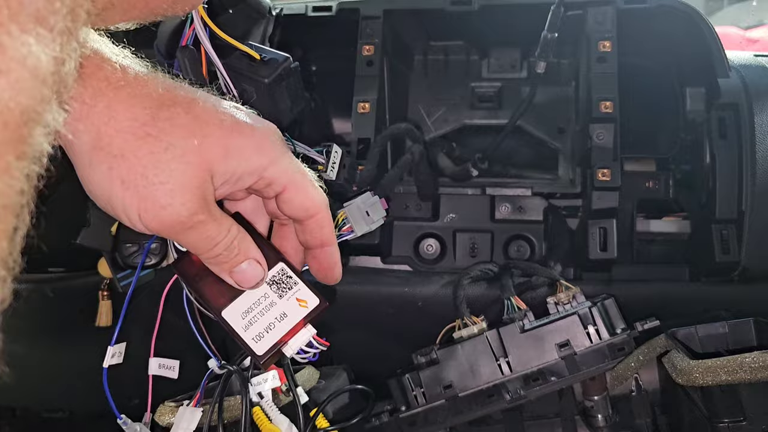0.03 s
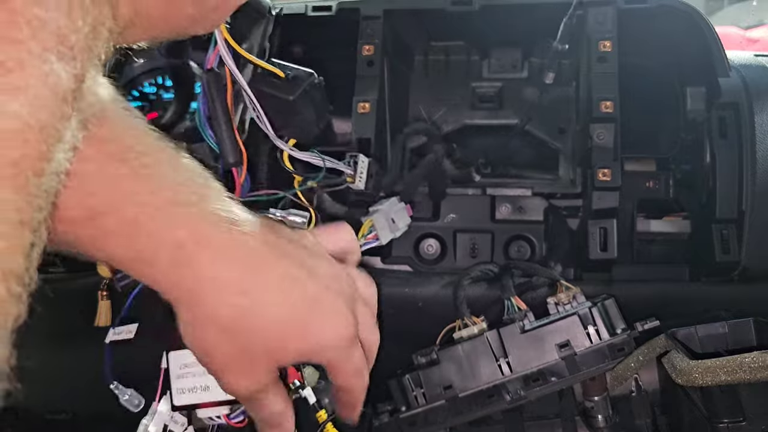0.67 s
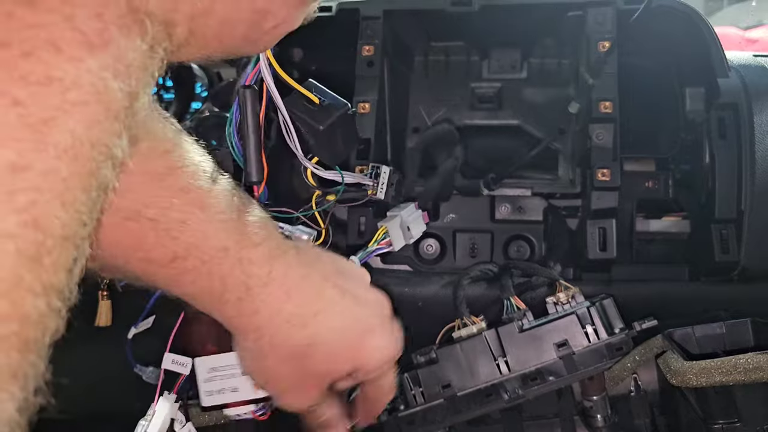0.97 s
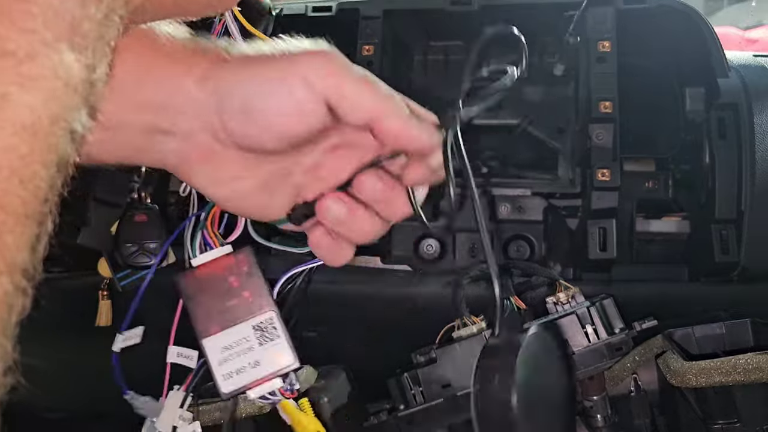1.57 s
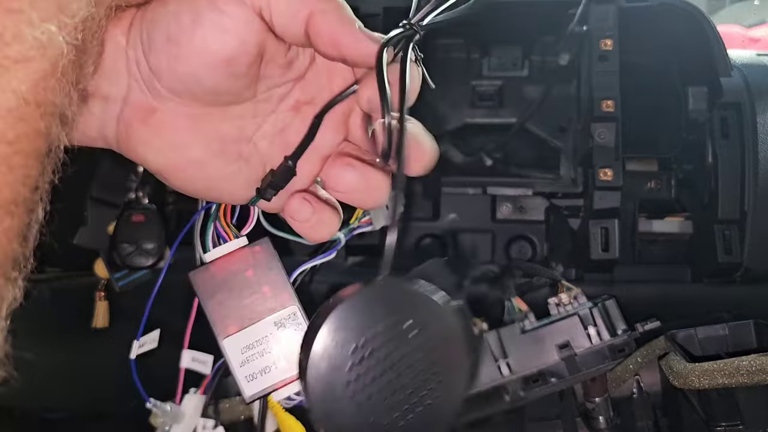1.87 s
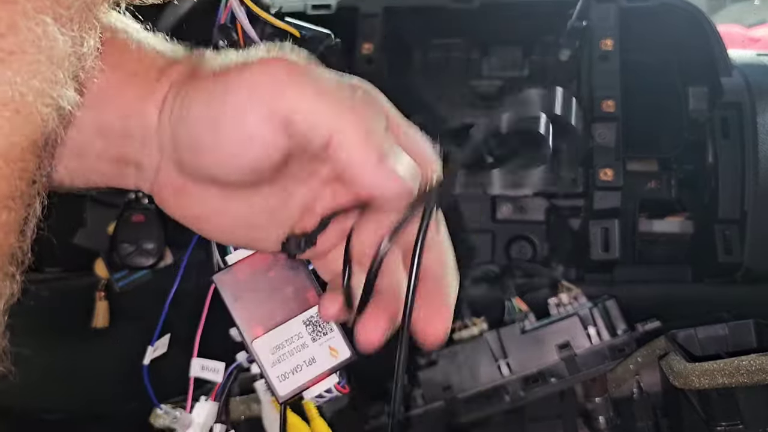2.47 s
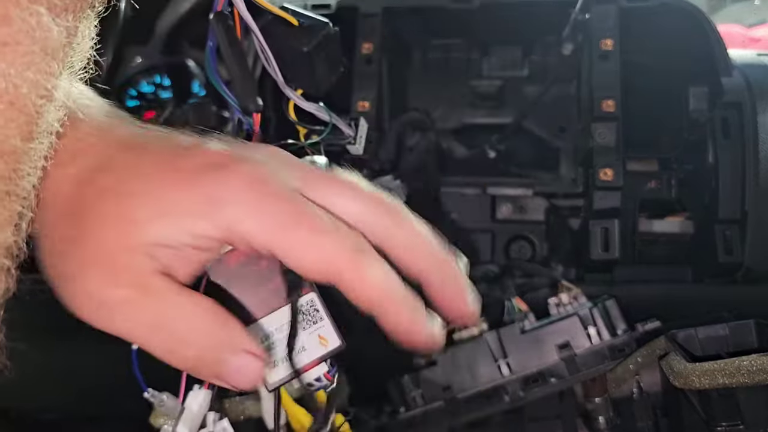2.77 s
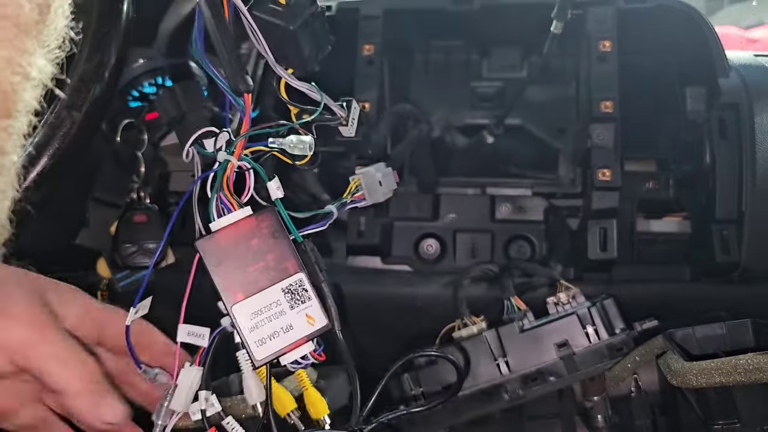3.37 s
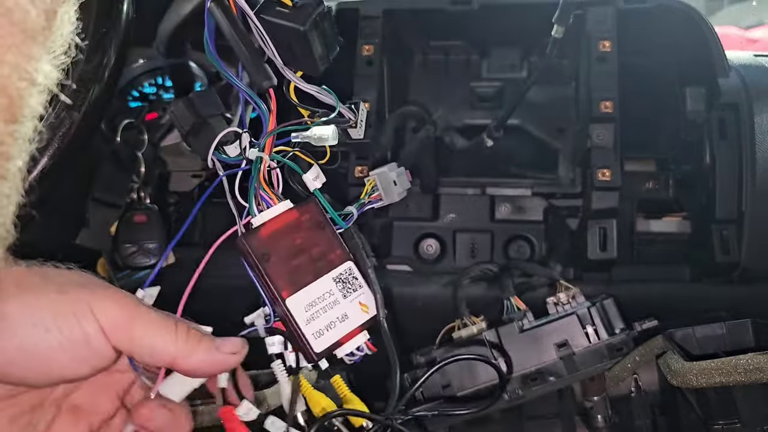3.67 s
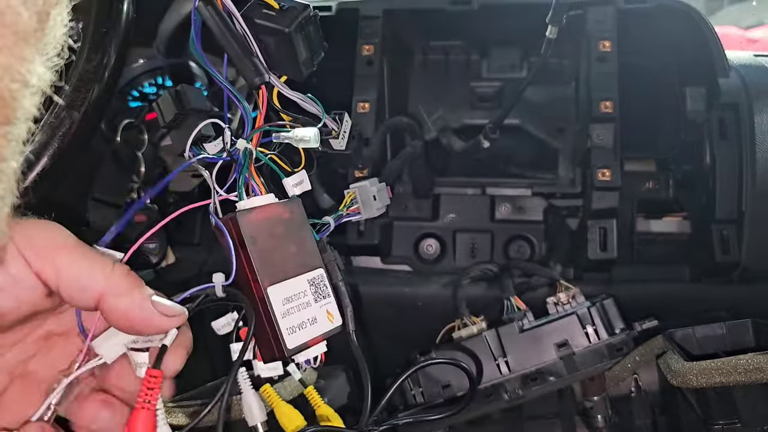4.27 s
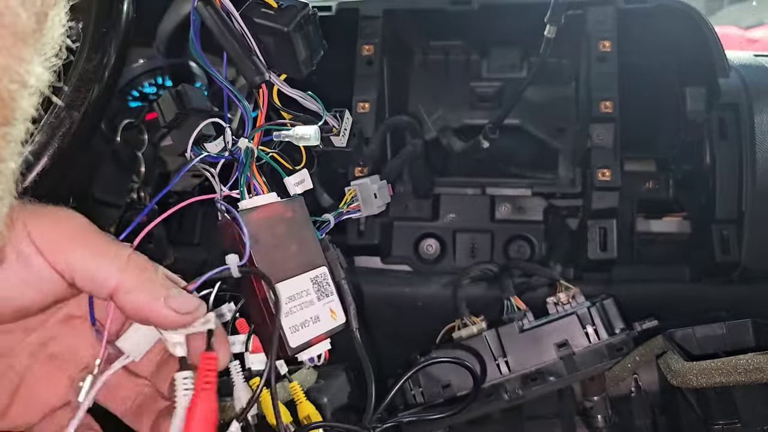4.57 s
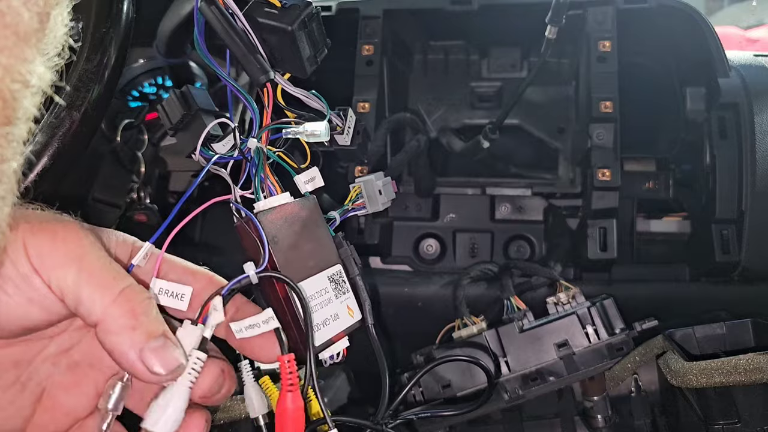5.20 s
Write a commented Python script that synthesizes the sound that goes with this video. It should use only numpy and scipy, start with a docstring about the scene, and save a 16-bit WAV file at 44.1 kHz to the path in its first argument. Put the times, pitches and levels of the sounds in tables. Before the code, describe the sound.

Hands sort a wiring harness in a car, with close plastic clicks, rustling cables and one hard knock against the dashboard.

```python
"""Plastic plugs clack and tick up close as hands sort a wiring harness in an opened car dashboard.
Each plug rings its hollow shell and shakes the trim; cables stick and slip, and fingers swish along them.
Midway a small speaker on its lead is set down with a bump and a hard knock that ring the dashboard panel.
A few very faint, high whistles come and go. A low rumble and a faint hiss fill the dead, padded cabin."""
import sys
import numpy as np
from scipy import signal
from scipy.fft import rfft, irfft, next_fast_len
from scipy.io import wavfile
from scipy.ndimage import uniform_filter1d, map_coordinates

SR = 44100
rng = np.random.default_rng(int(sys.argv[2]) if len(sys.argv) > 2 else 0)


def output_pcm(signal):
    """Save a mono or channel-first signal as 16-bit PCM at the path in sys.argv[1].

    Samples are clipped to [-1, 1] before scaling.
    """
    pcm = np.clip(np.atleast_2d(signal).T, -1, 1) * 32767
    wavfile.write(sys.argv[1], SR, np.round(pcm).astype(np.int16))


N = 235361
TIME = np.arange(N) / SR
RING = np.arange(SR // 5) / SR  # time axis of one hit or stroke, in seconds

# Levels in all tables are relative; each layer sets its own gain in the mix.
# bright snap of hard edges: pitch_hz, width_hz, level_db
EDGE_MODES = [(6020, 1500, -6), (7440, 830, 2), (7960, 1000, 1.5), (9260, 400, 1.5), (11180, 1000, -6.5),
              (14600, 2500, -12.5)]
# how hard the cables rub as the hands work: time_s, drag_db, swish_db
RUB_LEVELS = [(0.0, -55, -87), (0.27, -62.5, -79), (0.39, -51.5, -68), (0.77, -47, -60), (1.11, -53, -69.5),
              (1.31, -54.5, -60.5), (1.8, -51, -63.5), (2.36, -54, -73.5), (2.6, -58, -70),
              (2.75, -50, -64.5), (2.88, -43, -58.5), (3.03, -56, -64), (3.17, -46.5, -67.5),
              (3.36, -60, -71), (3.73, -55.5, -68.5), (3.88, -59.5, -67.5), (4.03, -59, -69.5),
              (5.34, -56.5, -71.5)]


def clack(trim_db, edge_db, shell_hz, trim_hz):
    """A plug rings its hollow shell and shakes the trim; a harder edge adds crack and snap."""
    # hollow plug shell: pitch_ratio, width_hz, level_db
    shell_modes = [(.58, 122, -10.5), (.82, 98.5, -7), (1, 65, 6), (1.28, 130, -11.5), (1.5, 170, -4.5)]
    # trim behind the plug: pitch_ratio, width_hz, level_db
    trim_modes = [(.7, 91, -3.5), (1, 69, 4), (1.5, 150, -4.5), (2.1, 221, -9)]
    # stiff plastic walls: pitch_hz, width_hz, level_db
    crack_modes = [(1832, 110, 3), (2650, 400, 0), (3360, 500, 3), (4270, 4000, 0.5), (5420, 1000, -7.5)]
    top_hz = 3540  # shell and trim radiate little above this
    shell = dull(strike(shell_modes, t60=0.0283, direct=0.75, tune=shell_hz), top_hz)
    trim = dull(strike(trim_modes, t60=0.0508, direct=0.83, tune=trim_hz), top_hz)
    crack = amp(0.68 * edge_db - 0.5) * strike(crack_modes, t60=0.0443, direct=0.19)
    snap = amp(edge_db) * strike(EDGE_MODES, t60=0.0189, direct=0.1) * pan(2.4)
    left_db = 2.5 + 1.6 * rng.standard_normal()  # the harness hangs to the left
    return amp(trim_db - 3.5) * trim + (shell + crack + snap) * pan(left_db)


def plug_clacks():
    """Plugs strike the dashboard; some bounce and land again, softer."""
    # plug hits: start_s, level_db, trim_db, edge_db, shell_hz, trim_hz, bounce_count
    hits = [(0.032, -46.5, 11.5, -39, 1080, 362, 0), (0.252, -37.5, -10, -25, 1113, 465, 0),
            (0.404, -33, -7, -19.5, 834, 437, 0), (0.69, -30.5, 9, -23, 1230, 343, 1),
            (1.1, -32, 10.5, -7.5, 1070, 326, 0), (1.166, -34.5, 10, -13, 810, 240, 0),
            (1.172, -25, 0.5, -22, 970, 610, 0), (1.204, -29.5, -11, -32, 1110, 332, 0),
            (1.382, -23.5, -5.5, 2.5, 1290, 450, 1), (1.568, -44, -2, -6, 900, 600, 0),
            (1.59, -26.5, -14, -14.5, 1111, 560, 0), (1.802, -43, -8, -34, 1070, 258, 0),
            (2.405, -37.5, 9, -35, 810, 270, 0), (3.077, -25, -3, -43, 903, 242, 0),
            (3.108, -15.5, -26, -23, 913, 334, 1), (3.155, -25, -6, -22.5, 838, 245, 0),
            (3.641, -34.5, 10.5, -25, 995, 364, 0), (3.675, -33, 7.5, -20, 910, 278, 0),
            (3.69, -32.5, 8, -17, 1090, 263, 0), (3.814, -47, 9, -18.5, 1510, 265, 0),
            (4.067, -43, 2.5, -10.5, 1050, 525, 0), (4.29, -50.5, 8, -36, 1460, 295, 0),
            (4.587, -45, 9.5, -11.5, 1030, 316, 0), (4.868, -39, 8, -36, 1020, 557, 0)]
    flight_s, bounce_db = 0.023, -12.5
    out = np.zeros((2, N))
    for start, db, trim_db, edge_db, shell_hz, trim_hz, bounces in hits:
        for k in range(1 + round(bounces)):
            landing = clack(trim_db, edge_db, shell_hz, trim_hz)
            add(out, start + k * flight_s, amp(db - 3 + k * bounce_db) * landing)
    return out


def plug_touches():
    """Loose plugs brush the trim by chance, louder while the cables are dragged harder."""
    touches_per_s, scatter_db, detune = 3, 1.2, 0.12
    out = np.zeros((2, N))
    drag_db, _ = curves(RUB_LEVELS)
    count = round(touches_per_s * N / SR)
    starts = rng.uniform(0, TIME[-1], count)
    for start, (size, shell, trim) in zip(starts, rng.standard_normal((count, 3))):
        db = drag_db[int(start * SR)] - 0.5 + scatter_db * size
        touch = clack(trim_db=5, edge_db=-24,
                      shell_hz=1383 * np.exp(detune * shell), trim_hz=312 * np.exp(detune * trim))
        add(out, start, amp(db) * touch)
    return out


def pin_ticks():
    """Pins and wire ends are too light to move the trim: treble only."""
    # light taps: start_s, level_db, snap_db, glint_db
    taps = [(0.473, -45.5, -15, -24), (0.6844, -44.5, 4.5, -10), (1.074, -41, 0, -9),
            (1.0862, -40, -6, -10), (1.1434, -32.5, -10, -25), (1.661, -39, -13, -18),
            (1.938, -39.5, -28, -24), (2.0634, -42, -24, -16), (2.6467, -32, -7, 3),
            (3.1009, -33.5, 14, -8), (3.184, -38, -13, -26), (3.244, -42.5, -27, -30),
            (3.7895, -42.5, -22, -29), (3.9687, -45, -8, -22), (4.3516, -51.5, 2.5, 4.5),
            (4.4543, -54, 4, 9), (4.4927, -53, -2, 3), (4.7728, -51, 3, -10)]
    # wire ends: pitch_hz, width_hz, level_db
    wire_modes = [(2824, 3300, 7.5), (4780, 350, 9.5), (6240, 810, -2.5)]
    # glint of metal pins: pitch_hz, width_hz, level_db
    pin_modes = [(11700, 400, -6), (13200, 1000, -8.5), (14300, 900, -9.5)]
    out = np.zeros((2, N))
    for start, db, snap_db, glint_db in taps:
        wire = strike(wire_modes, t60=0.034, direct=0.8)
        snap = amp(snap_db) * strike(EDGE_MODES, t60=0.039, direct=0.35)
        glint = amp(glint_db) * strike(pin_modes, t60=0.022, direct=0.4)
        add(out, start, amp(db - 9) * (wire + snap + glint) * pan(4))
    return out


def speaker_knocks():
    """The speaker lands on the dashboard; a softer contact leaves only the lowest panel modes."""
    # heavy blows: start_s, level_db, cutoff_hz, crack_db
    blows = [(2.694, -10, 215, -26), (2.722, -25.5, 59.5, -56), (2.808, -25, 200, -45),
             (2.904, 0, 1198, -22), (2.9114, -6.5, 1050, -16), (2.952, -17.5, 940, -23.5),
             (3.101, -18.5, 183, -36)]
    # dashboard panel: pitch_hz, width_hz, level_db
    panel_modes = [(54.86, 9.4, -6.5), (126.4, 40, -8.5), (164, 43, -3), (241.4, 55, -2.5), (345, 60, -5.5),
                   (494, 180, -6), (696, 120, -2), (828, 73, -5), (908, 89, -5.5), (1334, 75, -5),
                   (1471, 110, -9.5), (1900, 160, -18.5), (2130, 60, -16)]
    # the speaker's hard case: pitch_hz, width_hz, level_db
    case_modes = [(3170, 960, -2), (4300, 400, -2.5), (5200, 1300, -6.5)]
    out = np.zeros((2, N))
    for start, db, cutoff_hz, crack_db in blows:
        force = dull(contact(t60=0.034, direct=2.2, wide_db=-2), cutoff_hz)
        panel = crest(resonate(force, panel_modes))
        case = strike(case_modes, t60=0.081, direct=0.1)
        snap = amp(-6.5) * strike(EDGE_MODES, t60=0.054, direct=0.11)
        crack = amp(crack_db - 3.5) * (case + snap)
        add(out, start, amp(db - 5.5) * (panel + crack) * pan(2))
    return out


def cable_rub():
    """Insulation sticks and slips on the trim; skin swishes along the wires."""
    # tone of the drag: frequency_hz, level_db
    drag_tone = [(110, -40.5), (180, -5.5), (351, -2), (451, -13), (820, -16.5), (891, -13.5), (1080, -19),
                 (1350, -16.5), (1600, -26.5), (3390, -34), (4730, -32.5), (5000, -35.5), (6500, -65),
                 (11000, -120)]
    drag_db, swish_db = curves(RUB_LEVELS)
    slips = stereo_noise(N) * amp(2.4 * wobble(120))
    return amp(drag_db - 1.5) * colour(slips, drag_tone) + amp(swish_db + 1.5) * skin_swish()


def cable_pulls():
    """A firmly pulled cable chatters against the trim and the panel while fingers slide along it."""
    # pulls: start_s, end_s, chatter_db, cutoff_hz, swish_db
    strokes = [(0.208, 0.331, -64, 1500, -61), (0.687, 0.745, -40, 1700, -52.5),
               (0.778, 0.836, -38, 1010, -72), (0.891, 0.964, -74, 1000, -51.5),
               (1.1, 1.22, -45, 1600, -59), (1.789, 1.952, -51, 4000, -74), (1.982, 2.097, -56, 2500, -62),
               (2.92, 3.098, -39.5, 1330, -74), (3.529, 3.655, -48.5, 3200, -63),
               (3.645, 3.735, -38.5, 2200, -55)]
    # trim chattering under the cable: pitch_hz, width_hz, level_db
    trim_modes = [(158, 39, -2), (244, 160, -4), (319.5, 108, -2.5), (558, 49, -10.5)]
    # panel rasping under the cable: pitch_hz, width_hz, level_db
    panel_modes = [(728, 64, 6), (1068, 100, 1.5), (1302, 36, 3), (2020, 550, -7)]
    grip_s = 0.023  # time to take hold and to let go
    out = np.zeros((2, N))
    slips = stereo_noise(N) * amp(3.5 * wobble(200))
    chatter = unit(resonate(slips, trim_modes)) + amp(-1.5) * unit(resonate(slips, panel_modes))
    swish = skin_swish()
    for start, end, chatter_db, cutoff_hz, swish_db in strokes:
        span = slice(round(start * SR), round(start * SR) + len(RING))
        grip = np.clip(np.minimum(RING, end - start - RING) / grip_s, 0, 1)
        cable = amp(chatter_db) * dull(grip * chatter[:, span], cutoff_hz)
        add(out, start, cable + amp(swish_db) * grip * swish[:, span])
    return out


def skin_swish():
    """The fine grain of fingers sliding on insulation."""
    # tone of the swish: frequency_hz, level_db
    swish_tone = [(1060, -29), (1800, 3.5), (4450, 0), (5800, -2.5), (7700, 4), (10400, -5.5), (12000, 2),
                  (16000, -8.5)]
    grains = stereo_noise(N) * amp(2.4 * wobble(400) + 1.4 * wobble(35))
    return colour(grains, swish_tone) * pan(2)


def whistles():
    """Very faint, raspy whistles in two strands; each swells and rises, then sinks and fades."""
    # arches of pitch: middle_s, length_s, top_hz, level_db
    arches = [(1.44, 0.14, 14400, -73), (1.62, 0.24, 15600, -72), (1.9, 0.18, 14600, -74),
              (2.015, 0.22, 15300, -71), (5.14, 0.3, 13100, -73), (5.15, 0.26, 15100, -79)]
    # strands of one whistle: pitch_ratio, level_db
    strands = [(1, -3), (.77, -8)]
    sag, rasp_hz = 0.083, 140  # share of the pitch lost at both ends; fast pitch jitter
    out = np.zeros(N)
    for middle, length, top_hz, db in arches:
        arch = np.clip(1 - (2 * (TIME - middle) / length) ** 2, 0, 1)
        glide_hz = top_hz * (1 - sag * (1 - arch))
        for ratio, strand_db in strands:
            phase = 2 * np.pi * np.cumsum(ratio * glide_hz + rasp_hz * wobble(700)) / SR
            out += np.sqrt(arch) * np.sin(phase) * amp(db + strand_db)
    flicker = amp(4 * wobble(45))
    return out * flicker * amp([[2], [-3]])  # leaning left


def wall_echoes(x):
    """The narrow walls of the dashboard opening reflect only short waves, which combs the treble."""
    # echoes off the hard walls: left_delay_s, right_delay_s, level_db
    echoes = [(.0009, 0.0009, -32), (.0021, 0.0024, -9.5), (.0034, 0.0036, -16.5)]

    def comb(f):
        reflected = sum(amp(db) * np.exp(-2j * np.pi * f * np.array([[left], [right]]))
                        for left, right, db in echoes)
        highpass = 1j * f / (1500 + 1j * f)
        return 1 + reflected * highpass
    return filtered(x, comb)


def cabin_reverb(x):
    """The padded cabin answers briefly, longest in the bass."""
    # cabin decay: frequency_hz, t60_s
    decay = [(150, 0.28), (1000, 0.059), (4000, 0.053), (14000, 0.022)]
    hz, t, spectrum = signal.stft(stereo_noise(SR // 3), SR, nperseg=256)
    fade = amp(-60 * t / along(decay, hz)[:, None])
    _, tail = signal.istft(spectrum * fade, SR, nperseg=256)
    tail = np.pad(tail / np.linalg.norm(tail[0]), ((0, 0), (SR // 200, 0)))  # 5 ms pre-delay
    return signal.fftconvolve(x, tail, axes=1)[:, :N]


def cabin_tone():
    """The cabin's low rumble, nearly mono, under a wide hiss."""
    # tone of the rumble: frequency_hz, level_db
    rumble_tone = [(11, -49), (18, -1), (37, -6.5), (54, -0.5), (97, -6), (124, -10), (161, -16.5),
                   (199, -15.5), (257, -20), (309, -27.5), (400, -39), (520, -76), (880, -120)]
    # tone of the hiss: frequency_hz, level_db
    hiss_tone = [(180, -30.5), (300, -3), (343, -19.5), (470, 2), (814, -9), (885, -26), (946, -37),
                 (1390, -6), (1780, -13), (1930, -10), (2740, -16), (4670, -16), (9710, -24.5),
                 (12700, -35), (16000, -47)]
    rumble = amp(-44.5) * colour(stereo_noise(N), rumble_tone)
    hiss = amp(-59.5) * colour(stereo_noise(N), hiss_tone)
    return rumble + hiss


def contact(t60, direct, wide_db=0):
    """A sharp push, then dense scatter off the nearby trim; direct is the ratio of push to scatter."""
    envelope = (1 - np.exp(-RING / 0.0008)) * amp(-60 * RING / t60)
    mid, side = rng.standard_normal((2, len(RING))) * envelope
    mid[0] += direct * np.linalg.norm(mid)
    return stereo(mid, side, wide_db)


def strike(modes, t60, direct, tune=1):
    """A contact rings the modes, their pitches multiplied by tune."""
    tuned = [(tune * pitch, width, db) for pitch, width, db in modes]
    return crest(resonate(contact(t60, direct), tuned))


def resonate(x, modes):
    """Ring x through band-pass resonances of alternating polarity."""
    return filtered(x, lambda f: sum(
        (-1) ** k * amp(db) * 1j * f * width / (pitch ** 2 - f ** 2 + 1j * f * width)
        for k, (pitch, width, db) in enumerate(modes)))


def dull(x, top_hz):
    """A soft contact passes little above top_hz."""
    return filtered(x, lambda f: 1 / (1 + 1.3j * f / top_hz - (f / top_hz) ** 2))


def colour(x, tone):
    """Shape x with an EQ curve, at rms 1."""
    return unit(filtered(x, lambda f: amp(along(tone, f))))


def filtered(x, response):
    """Apply a complex frequency response to x."""
    n = x.shape[-1]
    size = next_fast_len(n + SR // 10)
    return irfft(rfft(x, size) * response(np.fft.rfftfreq(size, 1 / SR)), size)[..., :n]


def stereo(mid, side, wide_db=0):
    """Left and right at two close microphones, which differ mainly for short waves."""
    # stereo width: frequency_hz, side_db
    spread = [(60, -23.5), (110, -18.5), (200, -14.5), (380, -8.5), (700, -3), (1290, 0), (2380, -1),
              (4400, 0), (8120, 1), (15000, 0.5)]
    side = filtered(unit(side), lambda f: amp(along(spread, f) + wide_db))
    return np.array([unit(mid) + side, unit(mid) - side])


def stereo_noise(n):
    """Broadband noise, narrow in the bass and wide in the treble."""
    return stereo(*rng.standard_normal((2, n)))


def wobble(rate):
    """A smooth random curve, rate knots a second."""
    return map_coordinates(rng.standard_normal(int(N * rate / SR) + 4), [TIME * rate])


def along(points, hz):
    """Read (frequency_hz, value) points at hz on a log axis."""
    knots_hz, values = np.transpose(points)
    return np.interp(np.log(hz + 1), np.log(knots_hz + 1), values)


def curves(rows):
    """One automation curve for each column after the time."""
    times, *columns = np.transpose(rows)
    return [np.interp(TIME, times, column) for column in columns]


def amp(db):
    """Decibels to gain."""
    return 10 ** (np.asarray(db) / 20)


def pan(left_db):
    """Stereo gains with the left channel left_db above the right."""
    return amp([[left_db / 2], [-left_db / 2]])


def unit(x):
    """Scale to rms 1."""
    return x / np.sqrt(np.mean(x ** 2) + 1e-20)


def crest(x):
    """Scale a stereo hit so that its loudest 4 ms have rms 1."""
    power = uniform_filter1d(np.mean(x ** 2, 0), size=SR // 250)
    return x / np.sqrt(power.max() + 1e-20)


def add(track, start_s, sound):
    """Mix a stereo hit or stroke into the track."""
    part = track[:, round(start_s * SR):][:, :len(RING)]
    part += sound[:, :part.shape[1]]


def scene():
    """Plugs, speaker and cables up close, over the cabin's short reverb, rumble and hiss."""
    plugs = wall_echoes(plug_clacks() + plug_touches() + pin_ticks())
    knocks = speaker_knocks()
    cables = wall_echoes(cable_rub() + cable_pulls())
    reverb = cabin_reverb(amp(-8) * plugs + amp(-14.5) * knocks)
    return plugs + knocks + cables + reverb + whistles() + cabin_tone()


def record(dry):
    """Round off peaks near full scale and cut everything above 15.9 kHz."""
    rounded = dry / (1 + np.abs(dry) ** 8) ** (1 / 8)
    return filtered(rounded, lambda f: f < 15900)


dry = scene()
out = record(dry)
output_pcm(out)
```